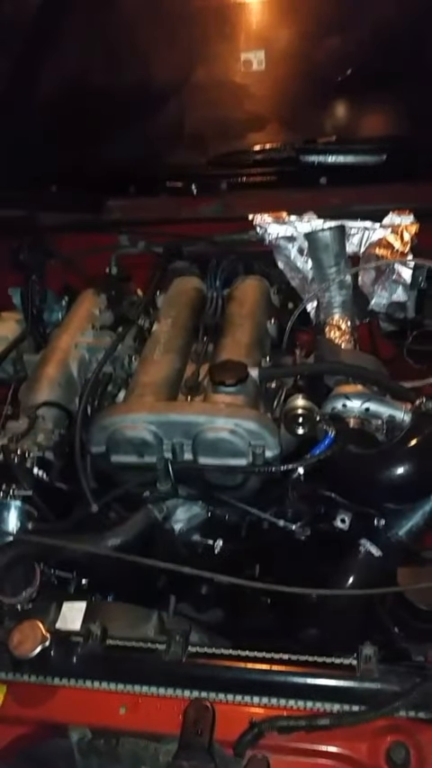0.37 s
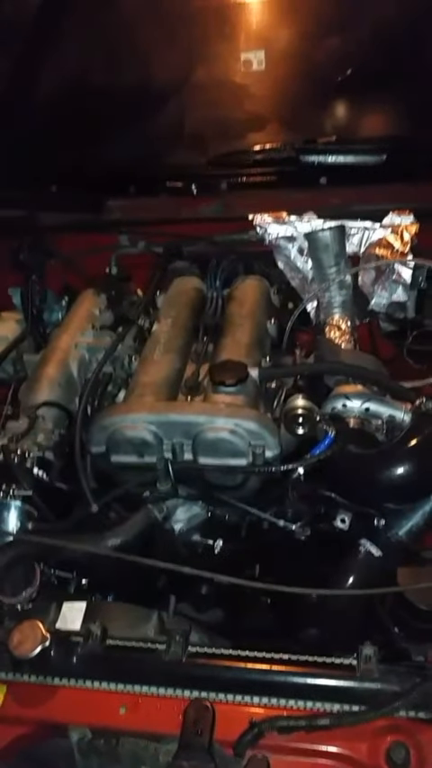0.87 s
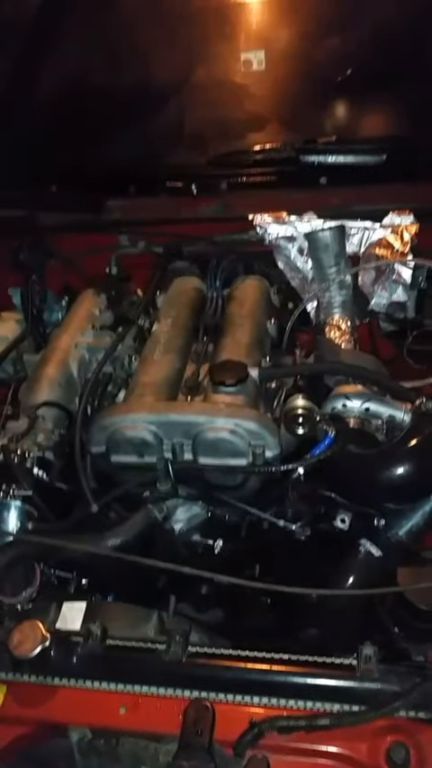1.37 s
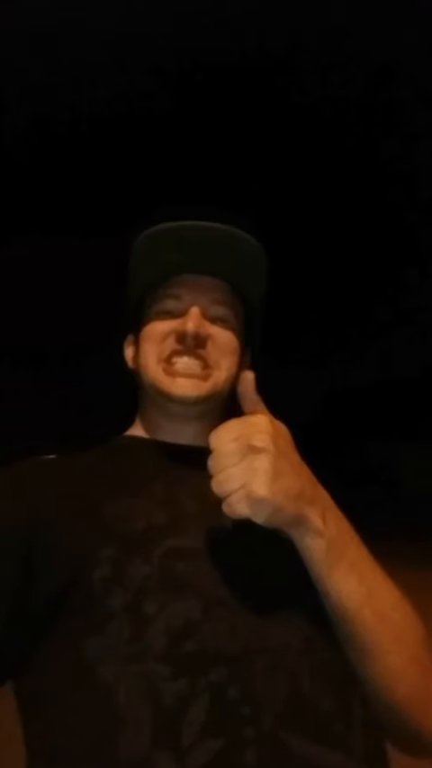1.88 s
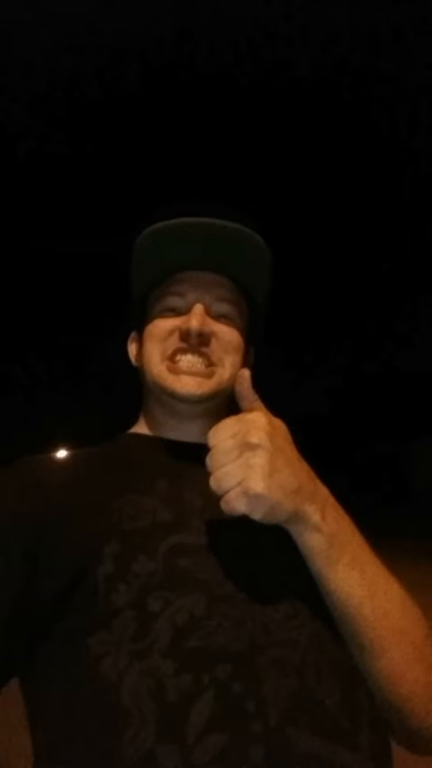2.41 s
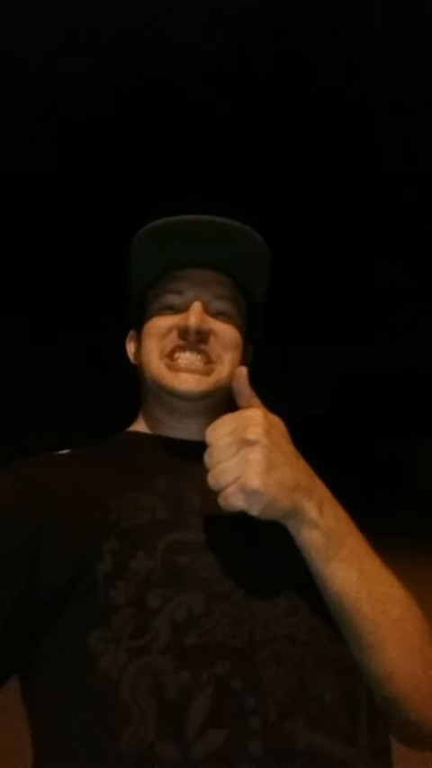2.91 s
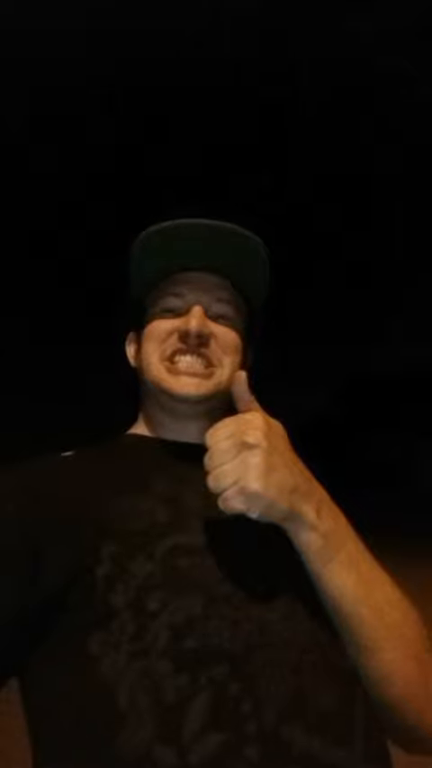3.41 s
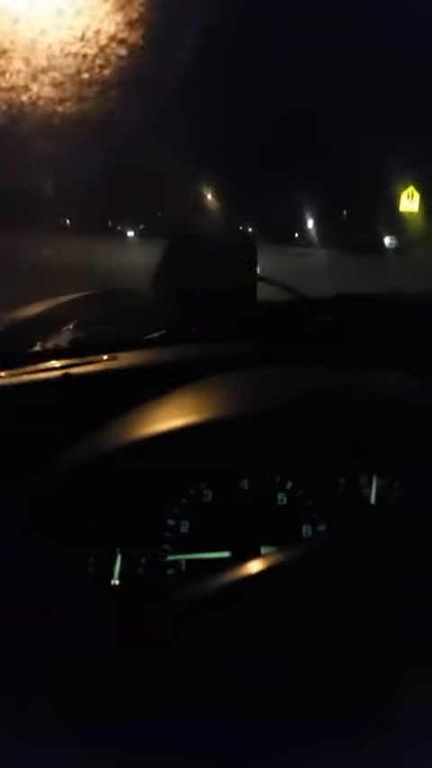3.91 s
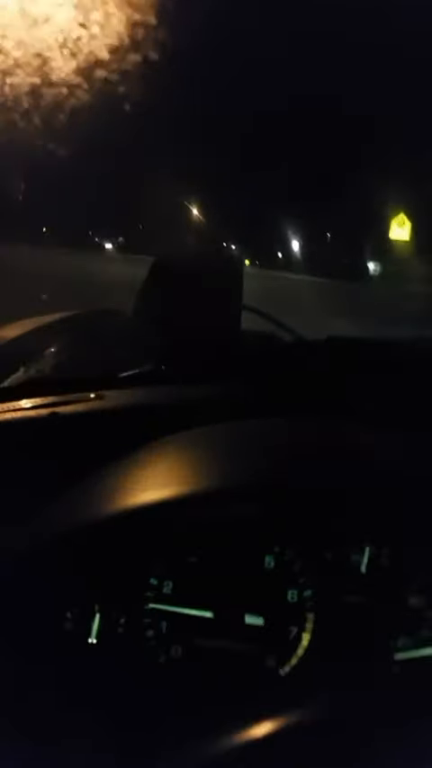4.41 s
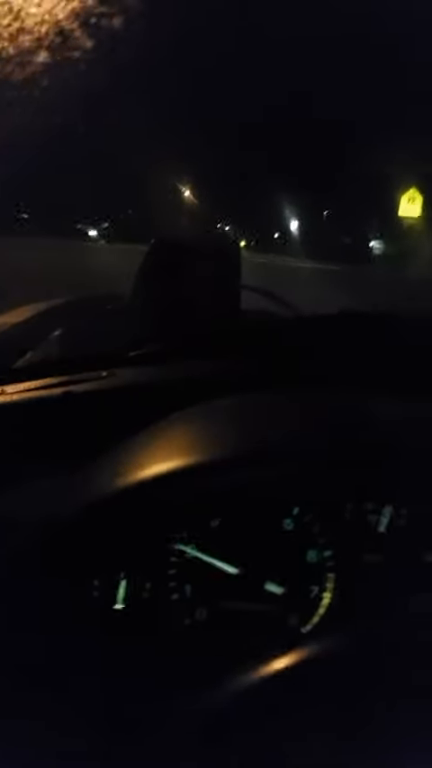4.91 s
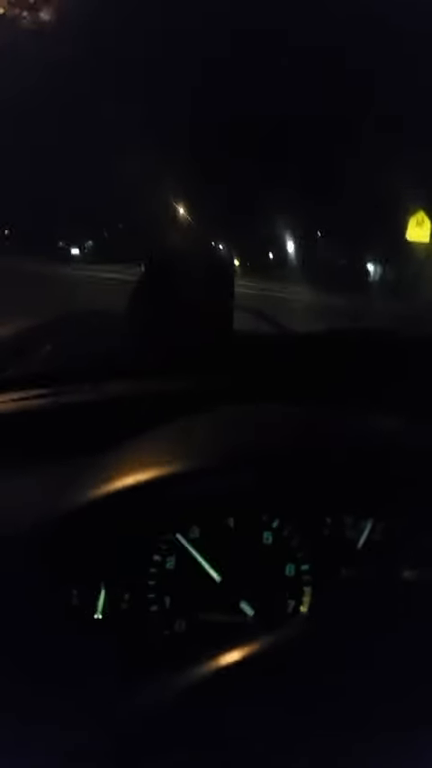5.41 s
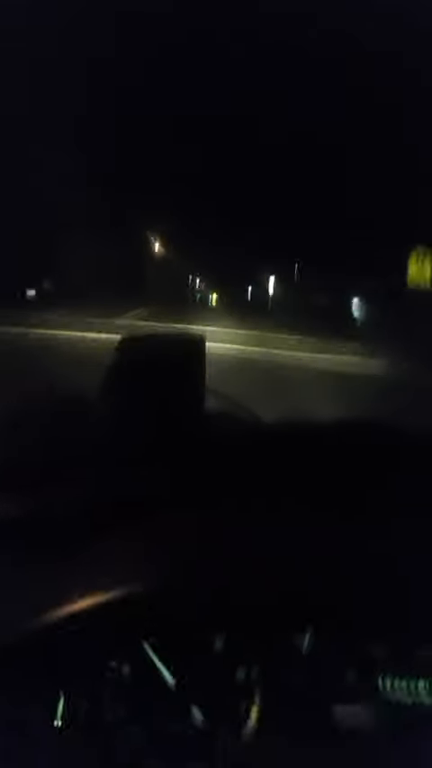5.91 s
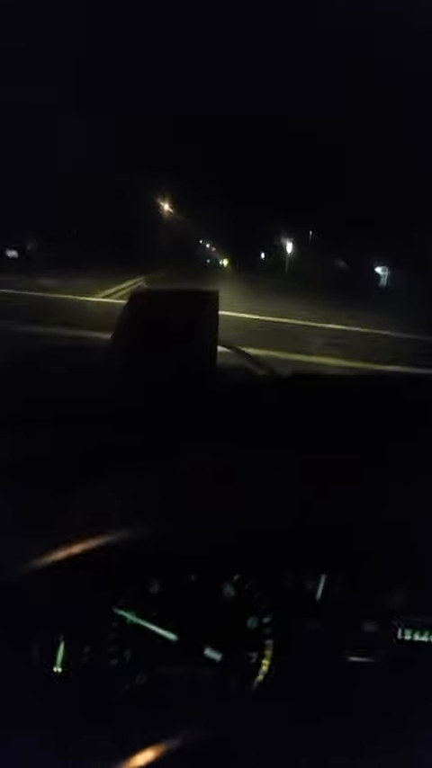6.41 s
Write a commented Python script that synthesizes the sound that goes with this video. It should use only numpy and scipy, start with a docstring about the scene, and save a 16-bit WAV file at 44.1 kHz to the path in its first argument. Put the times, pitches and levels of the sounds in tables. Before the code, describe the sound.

A lumpy open-exhaust idle thumps and spits up close, cuts out, then the car revs hard in the cabin, shifts and pulls again.

```python
"""Close by an open exhaust, then inside the cabin: a four-cylinder turbo car before a phone microphone.
By the pipe it idles in slow, hard firings with misfires: pulses echo in the pipe, gas jets hiss, metal rings.
The sound cuts out and one firing flashes by. In the cabin the car revs up, lifts off for a shift and pulls
again: sines at multiples of shaft speed boom in the bodywork, over filtered noise for rasp, intake air and
road, with a blurred tone for the turbo."""
import sys
import numpy as np
from scipy import signal
from scipy.fft import rfft, irfft, next_fast_len
from scipy.io import wavfile
from scipy.ndimage import uniform_filter1d, map_coordinates

SR = 44100
rng = np.random.default_rng(int(sys.argv[2]) if len(sys.argv) > 2 else 0)


def inscribe(sig):
    """Save sig as 16-bit PCM at rate SR to the path in sys.argv[1].

    A 1-D sig is mono; a 2-D sig holds one channel per row.
    Samples are clipped to [-1, 1] before scaling.
    """
    pcm = np.round(np.clip(np.atleast_2d(sig).T, -1, 1) * 32767)
    wavfile.write(sys.argv[1], SR, pcm.astype(np.int16))


def gain_from_db(level_db):
    """Convert decibel levels to linear amplitude factors (20 dB per decade)."""
    decades = np.asarray(level_db, float) / 20
    return 10 ** decades


N = 288855
T = np.arange(N) / SR  # seconds

# What is let through of the idle and of the drive. Each row: time in seconds, gain 0-1.
IDLE_ON = [(0, 1), (3.452, 1), (3.453, 0), (3.7263, 0), (3.7265, 1), (3.748, 0)]
DRIVE_ON = [(3.92, 0), (3.9205, .16), (3.96, .45), (4.06, 1), (6.01, 1), (6.038, .15), (6.05, 1)]

# By the pipe: the idle governor's pace. Each row: time in seconds, firings so far.
PACE = [(.0194, 0), (.2972, 8.083), (.583, 16.167), (.8652, 24.25), (1.1532, 32.333), (1.4386, 40.417),
        (1.7248, 48.5), (2.0144, 56.583), (2.302, 64.667), (2.5877, 72.75), (2.8732, 80.833),
        (3.1586, 88.917), (3.4407, 97)]
# Weak or missed firings. Each row: time in seconds, loss of thump, of gas and of metal in dB.
MISFIRES = [(.158, 3.5, 3, -2.5), (.193, 6, 18, 20), (.44, 11, 9, 10.5), (.474, 15, 16.5, 16),
            (.723, 10.5, 9, 2.5), (.757, 4, 10, 6.5), (1.005, 8, 9, 3), (1.042, 25, 19.5, 22.5),
            (1.29, 7.5, 12, 14), (1.324, 6.5, 22.5, 23.5), (1.568, 9, 6, 0.5), (1.605, 3.5, 6.5, 3),
            (1.854, 6.5, 7.5, 9.5), (1.889, 2.5, -2.5, -1.5), (2.136, 10.5, 16.5, 6.5),
            (2.423, 9.5, 10.5, 5.5), (2.459, 3.5, 7, 11), (2.707, 8, 9, 12.5), (2.986, 2.5, 12, 11),
            (3.162, 10, 14.5, 6), (3.273, 6.5, 11.5, 6), (3.447, 7.5, 14, 5)]
# A lost firing slows the crank, so the next ones come late until it recovers, swinging as they do.
LATE_S, LATER_S = .0019, .0007  # delays for a whole firing lost
KEPT, SWING = .78, .25  # share kept from firing to firing, swing in radians a firing
# A weak firing comes slightly late; the later pair of each four comes slightly early.
WEAK_LATE_S, EARLY_PAIR_S = .0017, .0003
# A full firing. Each row: thump, metal, spit, sizzle, in relative dB; then their scatter in dB.
FULL_DB = (-12, -31, -37, -43)
SCATTER_DB = (.6, 2.23, 1.6, 3)
SIZZLE_LOSS = 1.1  # dB of sizzle lost per dB of gas lost
# Thump of each cylinder, in dB added to the full firing.
CYLINDER_DB = (-0.61, -0.47, -0.22, -0.047)
# Gas jet as the idle goes on. Each row: time in seconds, change of spit and of sizzle in dB.
GAS = [(0, 3.5, 5), (.4, 0, -4), (0.601, 0, 3.5), (.9, 1.5, 6.5), (1.1, -0.5, -1.5), (1.5, 0, 0.5),
       (2.001, -2.5, -3), (2.4, 1, 1), (2.9, 0, 0), (3.4, -1.5, -2)]
# The lone firing: time in seconds, then thump, metal, spit, sizzle in relative dB.
FLASH = (3.7255, -18.5, -34.5, -40, -52)
# Hot gas jet at the pipe mouth, low and high part. Each row: frequency in Hz, relative dB per Hz.
JET = [(1470, -1), (2500, -9), (3110, -4), (3740, -11), (4050, -2.5), (4440, -13), (4860, -0.5),
       (6350, 2.5), (7190, -1), (9000, -17.5), (11700, -46), (19800, -120)]
SIZZLE = [(5290, -40), (9000, -24.5), (9680, -15), (12100, 0), (13400, -6.5), (14200, -9.5)]
# Pipe and sheet metal rung by each firing. Each row: frequency in Hz, width in Hz, relative dB.
RINGS = [(365, 24, 2), (450, 60, -11), (680, 140, -15), (796, 45, -8), (900, 80, -15), (1069, 55, -12),
         (1329, 120, -20), (1613, 55, -13), (2128, 80, -24)]
# Valve gear, belts and fan between firings. Each row: frequency in Hz, relative dB per Hz.
BAY = [(47, -40.5), (80, 11), (313, -6), (424, -17), (699, -3), (1150, -21.5), (1590, -25.5), (2510, -28),
       (5840, -23.5), (6370, -22), (9010, -44), (12800, -34.5), (14200, -38.5)]

# In the cabin: the drive. Each row: time in seconds, crankshaft speed in Hz, load heard as exhaust rasp
# in relative dB, intake hiss in relative dB.
DRIVE = [(3.93, 50.37, -34.5, -36), (4.14, 53.2, -35.5, -38.5), (4.27, 57.98, -31.5, -39),
         (4.46, 67.96, -33, -37.5), (4.6, 70, -32.5, -39.5), (4.65, 72.64, -33, -41.5),
         (4.84, 82.13, -33, -43), (5.01, 88.5, -31.5, -38), (5.21, 97.8, -33, -40),
         (5.32, 104, -33.5, -39.5), (5.38, 105.2, -34, -45), (5.44, 101.5, -42.5, -44),
         (5.57, 93.17, -40.5, -44), (5.83, 78.47, -42.5, -45), (5.93, 66.27, -44.5, -46.5),
         (5.97, 67.64, -36, -45.5), (6.0, 65.8, -36, -42.5), (6.05, 58.75, -37, -40),
         (6.14, 68.04, -34, -42), (6.38, 67.3, -33.5, -38.5), (6.55, 71.36, -33, -40)]
# Throttle. Each row: time in seconds, 1 for pushing or -1 for shut, when the pulses turn to suction.
THROTTLE = [(5.405, 1), (5.42, -1), (6.035, -1), (6.045, 1)]
# Main shaft orders. Each row: multiple of shaft speed, relative dB at full load, dB lost per dB of load lost.
ORDERS_LOW = [(1, -14.5, -.3), (2, -14, 0.92), (3, -15.5, 0.68), (4, -22.5, 0), (5, -23.5, 2.2)]
FULL_LOAD_DB = -33  # rasp value of DRIVE that counts as full load
# How the cabin passes a low order as it sweeps. Each row: frequency in Hz, gain in dB.
BOOM = [(52, -35), (56, -9), (68, -10.5), (85, -10.5), (105, -8.5), (135, -5.5), (150, -2.5), (210, -0.5),
        (245, -5), (266, -17), (288, -4.5), (316, -2.5), (345, -20.5), (390, -27.5), (415, -7.5),
        (440, -0.5), (477, 4), (520, -9.5)]
# Weaker shaft orders under load. Each row: multiple of shaft speed, relative dB.
ORDERS_UP = [(1.5, 6), (2.5, -4), (3.5, -3.5), (4.5, -6.5), (5.5, -11), (6, 1.5), (6.5, -9), (7, -3.5),
             (8, -4.5), (9, -6.5), (10, -5), (11, -6), (12, -9), (14, -9.5)]
# Cabin booms that colour the higher orders and the rasp. Each row: frequency in Hz, width in Hz, relative dB.
CABIN = [(196.7, 36.4, -3), (328, 18, 1), (422.6, 28.8, 2.5), (469, 45.8, -0.5), (675, 90, -9.5),
         (847, 93, -10.5), (960, 23.3, -6.5), (1162, 53, -9.5), (1281, 36, -15.5), (1440, 29, -24),
         (1870, 390, -30), (2798, 51, -24)]
# Exhaust edge that grows with revs: frequency in Hz, width in Hz, dB over the rasp at 79 Hz shaft, dB per Hz.
EDGE = (2802.5, 150, -20, 0.2644)
# Intake air. Each row: frequency in Hz, relative dB per Hz.
INTAKE = [(880, -18.5), (1500, 3), (1620, -2), (1950, -1.5), (2870, -8), (3240, -8.5), (5810, -5.5),
          (7640, -15), (8960, -48), (11800, -23.5), (14200, -29)]
# Panels that buzz with the intake air. Each row: frequency in Hz, width in Hz, relative dB.
PANELS = [(2090, 46, 9.5), (2930, 160, 1), (3570, 33, 6), (4650, 230, -15.5), (4970, 96, -4), (5500, 61, 0)]
# Turbo whistle. Each row: time in seconds, frequency in Hz, dB over the hiss value.
TURBO = [(3.95, 5500, -18), (4.5, 5900, -14.5), (4.9, 6310, -14), (5.2, 7580, -16.5), (5.36, 8310, -16),
         (5.5, 7580, -14), (5.65, 6740, -8), (5.8, 6190, -4.5), (6.0, 5270, -5), (6.1, 5300, -9),
         (6.3, 5870, -9), (6.55, 6330, -17.5)]
# Road rumble, then body drone. Each row: frequency in Hz, relative dB per Hz.
ROAD = [(12, -17), (25, 1), (42, 17), (60, -21), (120, -74.5)]
BODY = [(30, -31), (60, 6), (150, 3.5), (260, 1), (340, 3.5), (450, -30), (600, -51.5)]
# Bumps in the road. Each row: time in seconds, relative dB, length in seconds.
BUMPS = [(4.264, -40.5, .06), (4.6, -37.5, 0.069), (4.84, -38, .07), (5.376, -32, .08), (5.56, -28, 0.045),
         (5.91, -28, .04), (6.057, -29, 0.022), (6.38, -28, .04), (6.522, -32, .05)]
RUMBLE_DB = -44  # steady rumble, on the same scale as the bumps
# Gear taking up the drive: time in seconds, level in dB, frequency in Hz.
ENGAGE = (6.05, -35, 2500)

TOP_HZ = 14350  # band limit of the microphone


def unit(x):
    """Scaled to rms 1."""
    return x / np.sqrt(np.mean(x ** 2) + 1e-20)


def curves(rows):
    """One value per sample for each column after the time."""
    s, *cols = np.transpose(rows)
    return [np.interp(T, s, c) for c in cols]


def gain_at(points, hz):
    """Gain of (Hz, dB) points read on a log axis."""
    f, db = np.transpose(points)
    return gain_from_db(np.interp(np.log(hz + 1), np.log(f + 1), db))


def resonances(modes, f):
    """Complex response of a row of resonances, their signs alternating."""
    total = 0
    for k, (centre, width, db) in enumerate(modes):
        damping = 1j * f * width
        total = total + (-1) ** k * gain_from_db(db) * damping / (centre * centre - f * f + damping)
    return total


def filtered(x, response):
    """x times a response of frequency."""
    m = next_fast_len(N + SR // 2)
    return irfft(rfft(x, m) * response(np.fft.rfftfreq(m, 1 / SR)), m)[:N]


def noise(points, patchy_db=0):
    """Coloured noise of rms 1, its level uneven in patches of time and pitch."""
    z = signal.stft(rng.standard_normal(N + 512), nperseg=512)[2]
    field = uniform_filter1d(rng.standard_normal(z.shape), size=2, axis=0)
    field = uniform_filter1d(field, size=8, axis=1)
    white = signal.istft(z * gain_from_db(patchy_db * unit(field)), nperseg=512)[1][:N]
    return unit(filtered(white, lambda hz: gain_at(points, hz)))


def ringing_noise(x, modes, power=1):
    """Noise x heard through resonances, scaled to rms 1."""
    return unit(filtered(x, lambda f: resonances(modes, f) ** power))


def wobble(rate):
    """A smooth random curve, rate knots a second."""
    return map_coordinates(rng.standard_normal(int(N * rate / SR) + 4), [T * rate])


def train(s, db):
    """One impulse at each time, shared between the two nearest samples."""
    at = np.clip(s * SR, 0, N - 2)
    whole, part = at.astype(int), at % 1
    return np.bincount(whole, gain_from_db(db) * (1 - part), N) + np.bincount(whole + 1, gain_from_db(db) * part, N)


def strokes(s, db, shape):
    """An envelope started at every firing."""
    return signal.fftconvolve(train(s, db), shape)[:N]


def firings():
    """Time and four levels of every firing: a steady pace upset by misfires, then the lone firing."""
    pace_s, counted = np.transpose(PACE)
    k = np.arange(round(counted[-1]) + 1)
    s = np.interp(k, counted, pace_s)
    miss_s, *lost = np.transpose(MISFIRES)
    lost_db = np.zeros((3, len(k)))
    lost_db[:, np.abs(s - miss_s[:, None]).argmin(axis=1)] = lost
    thump, gas, metal = lost_db
    missing = 1 - gain_from_db(-thump)
    recovery = [1, -2 * KEPT * np.cos(SWING), KEPT ** 2]
    s = s + signal.lfilter([0, LATE_S, LATER_S], recovery, missing)
    s = s + WEAK_LATE_S * (missing > 0) - EARLY_PAIR_S * (k % 4 > 1)
    gas_s, *gas_db = np.transpose(GAS)
    spit, sizzle = (np.interp(s, gas_s, db) for db in gas_db)
    chance = rng.standard_normal((len(k), 4))
    chance[:, 3] = (chance[:, 2] + chance[:, 3]) / np.sqrt(2)  # a fat spit sizzles more
    thump_change = np.take(CYLINDER_DB, k % 4) - thump
    changes = np.transpose([thump_change, -metal, spit - gas, sizzle - SIZZLE_LOSS * gas])
    levels = np.array(FULL_DB) + changes + np.array(SCATTER_DB) * chance
    return np.vstack([np.c_[s, levels], FLASH]).T


def pipe(f, pulse_s, echo, trip_s, dull_hz):
    """A gas pulse excites two silencer chambers and runs up and down the pipe, duller at each trip."""
    s = 1j * f
    pulse = -np.exp(-.5 * (2 * np.pi * f * pulse_s) ** 2)
    # an open end sends out the change of flow; the microphone thins the deep bass
    flow_change = s / 85
    microphone = f ** 2 / (f ** 2 + 40 ** 2)
    silencer = 1 + resonances([(93, 44, 10.5)], f) + resonances([(181, 25, 1.6)], f)
    trips = 1 - echo * np.exp(-2 * np.pi * s * trip_s) / (1 + s / dull_hz)
    return pulse * flow_change * microphone * silencer / trips


def exhaust_thump(s, db):
    """Each firing sends a pulse down the pipe and knocks its lowest metal ring."""
    thump = filtered(train(s + .0012, db + 43.7),
                     lambda f: pipe(f, pulse_s=.0013, echo=.68, trip_s=.0124, dull_hz=82))
    knock = filtered(train(s - .0033, db + 19), lambda f: resonances(RINGS[:1], f) / (1 + 1j * f / 600))
    return thump + knock


def again(shape, share):
    """The same envelope once more, weaker, after one trip along the pipe."""
    return shape + share * np.pad(shape, (round(0.012 * SR), 0))[:len(shape)]


def burst(rise_s, fall_s):
    """The jet peaks within a few ms, then blows on more softly around 8 ms."""
    t = T[:SR // 8]
    swell = (t / rise_s) ** 2 * np.exp(2 - 2 * t / rise_s)
    peak = 0.92 * np.exp(-((t - rise_s) / 0.00042) ** 2)
    return swell + peak + 0.7 * np.exp(-((t - .008) / fall_s) ** 2)


def gas_jet(s, spit_db, sizzle_db):
    """Hot gas spits out of the pipe mouth as bursts of noise, the high part flickering."""
    spit = strokes(s - .0047, spit_db + 1.0, again(burst(0.0038, 0.0042), 0.18))
    sizzle = strokes(s - .0044, sizzle_db + 4.5, again(burst(0.0033, 0.0031), .1))
    flicker = unit(gain_from_db(3.5 * wobble(700)) * noise(SIZZLE, patchy_db=3.0))
    return spit * noise(JET, patchy_db=1.5) + sizzle * flicker


def rung_metal(s, db):
    """Each firing gives pipe and sheet metal one blow, then a loose rattle, and they ring."""
    t = T[:SR // 8]
    rap = signal.fftconvolve(train(s - .001, db + 5.5), np.exp(-t / .00008))[:N]
    shake = strokes(s - .0036, db, again(np.exp(-t / 0.0064), 0.3))
    return gain_from_db(32.5) * filtered(rap + shake * rng.standard_normal(N), lambda f: resonances(RINGS, f))


def engine_bay():
    """Between firings the pipe keeps ringing, as narrow noise, and valve gear, belts and fan rustle."""
    hum = ringing_noise(rng.standard_normal(N), RINGS[:1], power=2)
    rustle = noise(BAY, patchy_db=4.5)
    return gain_from_db(-40 + 2.1 * wobble(20)) * hum + gain_from_db(-30.5 + 2.4 * wobble(30.16)) * rustle


def idle():
    """Close by the pipe: every firing thumps, spits gas and rings the metal."""
    s, thump_db, metal_db, spit_db, sizzle_db = firings()
    return (exhaust_thump(s, thump_db) + gas_jet(s, spit_db, sizzle_db)
            + rung_metal(s, metal_db) + engine_bay())


def order(k, shaft_hz, drift):
    """A sine at k times the shaft speed, its phase turned as the cabin booms turn it."""
    turn = 2 * np.pi * np.cumsum(shaft_hz) / SR
    cabin_phase = np.angle(resonances(CABIN, k * shaft_hz))
    return np.cos(k * turn + np.pi * (k % 2) + cabin_phase + drift * wobble(22))


def cabin_boom(shaft_hz, rasp_db, throttle, shut):
    """Main shaft orders sweep through the cabin's booms, turning over when the throttle shuts."""
    boom = 0
    for k, db, follows in ORDERS_LOW:
        level = np.sqrt(2) * gain_from_db(db + follows * (rasp_db - FULL_LOAD_DB) + .6 * wobble(25))
        boom = boom + level * gain_at(BOOM, k * shaft_hz) * order(k, shaft_hz, drift=.1)
    # uneven burning on the overrun
    overrun = gain_from_db(-31 + 3 * wobble(12)) * order(3.5, shaft_hz, drift=.8)
    return throttle * boom + shut * overrun


def exhaust_rasp(shaft_hz, rasp_db, shut, beat):
    """Load lifts the weaker orders and rough noise; the cabin picks out what meets a boom."""
    upper = 0
    for k, db in ORDERS_UP:
        picked = np.abs(resonances(CABIN, k * shaft_hz))
        upper = upper + gain_from_db(db + 2 * wobble(15)) * picked * order(k, shaft_hz, drift=.3)
    rasp = ringing_noise(beat * rng.standard_normal(N), CABIN)
    rasp = gain_from_db(9.5 - 2 * shut + 0.82 * wobble(30)) * rasp
    edge_hz, width_hz, edge_db, per_hz = EDGE
    edge = ringing_noise(beat * rng.standard_normal(N), [(edge_hz, width_hz, 0)], power=2)
    edge = gain_from_db(edge_db + per_hz * (shaft_hz - 79)) * (1 - shut) * edge
    return gain_from_db(rasp_db) * (gain_from_db(10.0 - 4.6 * shut) * upper + rasp + edge)


def turbo_whistle():
    """A gliding tone blurred by slow noise into a narrow whistle."""
    turbo_hz, turbo_db = curves(TURBO)
    blur = uniform_filter1d(rng.standard_normal(N), size=64)
    blur = unit(uniform_filter1d(blur, size=64))
    return gain_from_db(turbo_db) * np.sqrt(2) * blur * np.cos(2 * np.pi * np.cumsum(turbo_hz) / SR)


def intake_air(hiss_db, shut, beat):
    """Intake air hisses and buzzes the panels, with the turbo whistle and a faint whine while coasting."""
    hiss = gain_from_db(-0.5) * noise(INTAKE, patchy_db=3.5) * beat ** 0.5
    buzz = unit(filtered(rng.standard_normal(N), lambda f: resonances(PANELS, f) * (f < 7500)))
    buzz = gain_from_db(-6.5 - 3.3 * shut) * buzz
    coasting = shut * np.clip((T - 5.45) / .25, 0, 1)
    whine = coasting * gain_from_db(-8) * noise([(4500, -40), (4660, 0), (4780, 0), (4900, -40)])
    return gain_from_db(hiss_db + 0.89 * wobble(40)) * (hiss + buzz + turbo_whistle() + whine)


def road_and_body(hiss_db):
    """Low noise swells at each bump; the body's drone follows the intake hiss at half its dB."""
    jolts = gain_from_db(RUMBLE_DB)
    for s, db, length_s in BUMPS:
        jolts = jolts + gain_from_db(db) * np.exp(-((T - s) / length_s) ** 2)
    road = jolts * gain_from_db(3.0 + 2.3 * wobble(8.8)) * noise(ROAD)
    return road + gain_from_db(.5 * hiss_db - 9.5) * noise(BODY)


def gear_knock():
    """The gear takes up the drive: a tone with a little noise, down 60 dB in 0.12 s."""
    s, db, hz = ENGAGE
    after = np.clip(T - s, 0, None)
    grit = 0.17 * (T > s) * rng.standard_normal(N)
    return gain_from_db(db - 60 * after / 0.12) * (np.sin(2 * np.pi * hz * after) + grit)


def drive():
    """Inside the cabin: shaft orders, rough exhaust, intake air, turbo, road and gear."""
    shaft_hz, rasp_db, hiss_db = curves(DRIVE)
    throttle, = curves(THROTTLE)
    shut = (1 - throttle) / 2  # 0 pushing, 1 shut
    # uneven burning: noise that swells once a turn
    beat = 1 + .7 * np.cos(2 * np.pi * np.cumsum(shaft_hz) / SR)
    return (cabin_boom(shaft_hz, rasp_db, throttle, shut) + exhaust_rasp(shaft_hz, rasp_db, shut, beat)
            + intake_air(hiss_db, shut, beat) + road_and_body(hiss_db) + gear_knock())


def scene():
    """The idle by the pipe, silence around one lone firing, then the drive in the cabin."""
    idle_gain, = curves(IDLE_ON)
    drive_gain, = curves(DRIVE_ON)
    return (idle_gain * idle() + drive_gain * drive())[None]


def band_limit(x):
    """A steep low-pass at the top of the band."""
    return signal.sosfilt(signal.butter(12, 14360, fs=SR, output="sos"), x)


def record(dry):
    """A phone microphone that rounds off peaks and has a band limit."""
    soft = dry[0] / (1 + np.abs(dry[0] / .72) ** 5) ** (1 / 5)
    mix = filtered(soft, lambda hz: hz < TOP_HZ)[None]
    return band_limit(mix)


dry = scene()
out = record(dry)
inscribe(out)
```